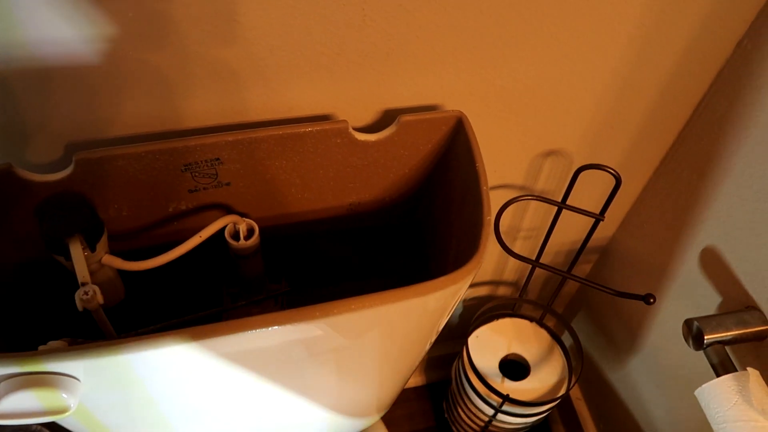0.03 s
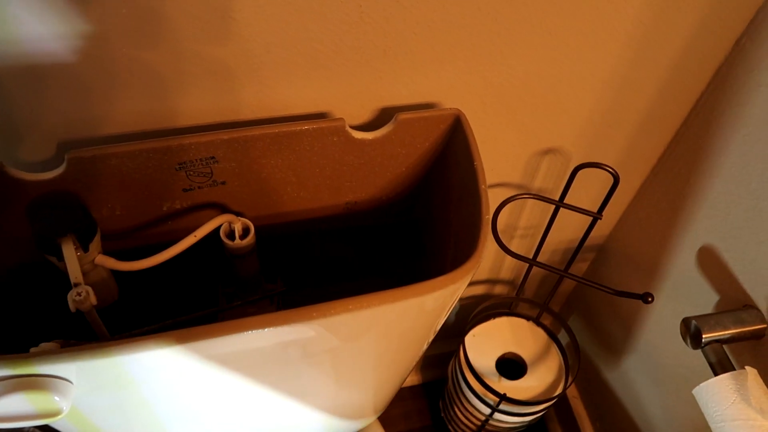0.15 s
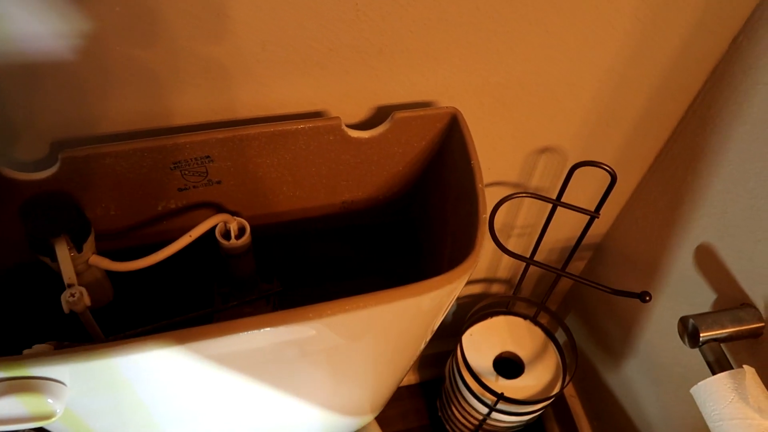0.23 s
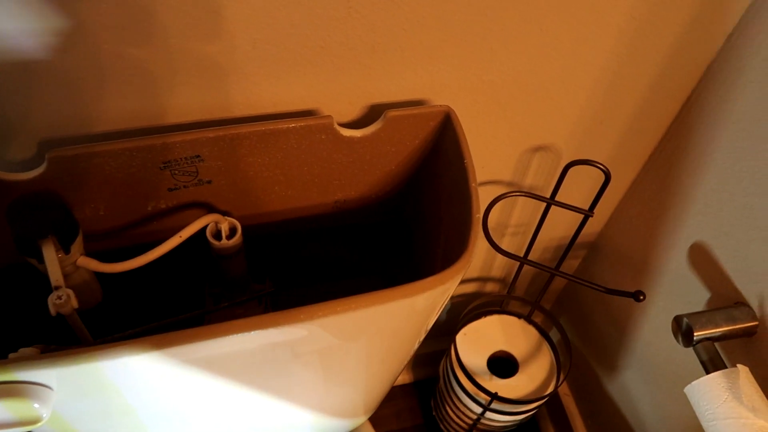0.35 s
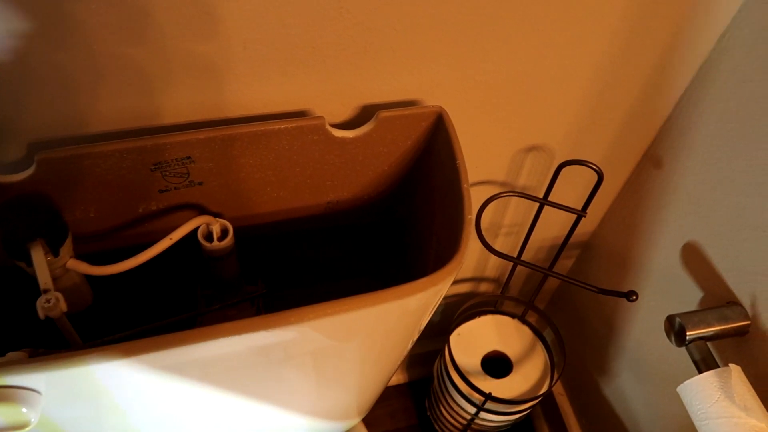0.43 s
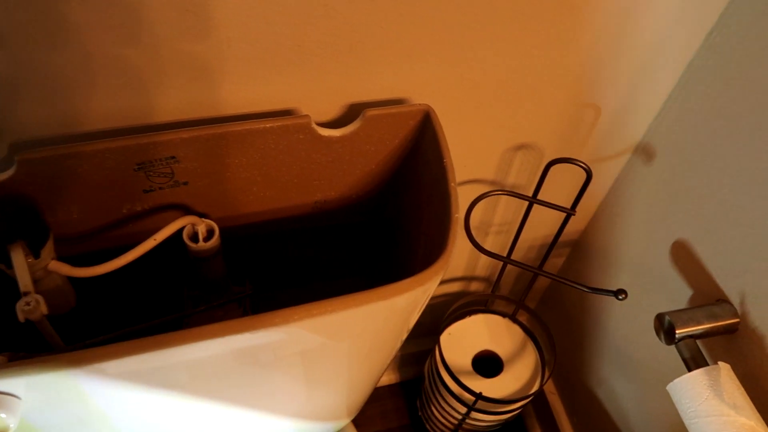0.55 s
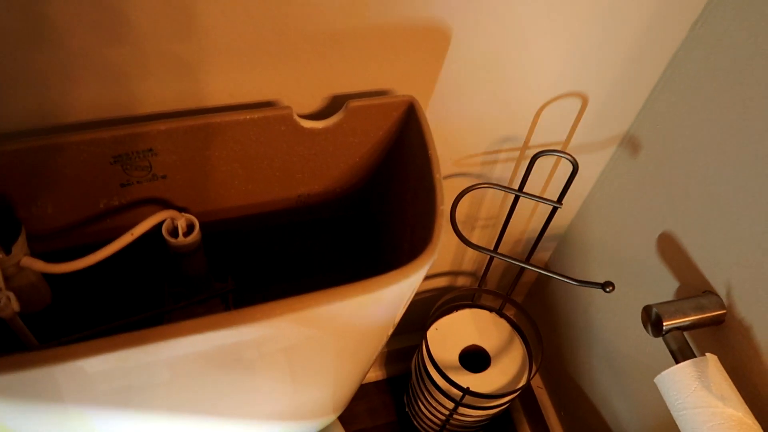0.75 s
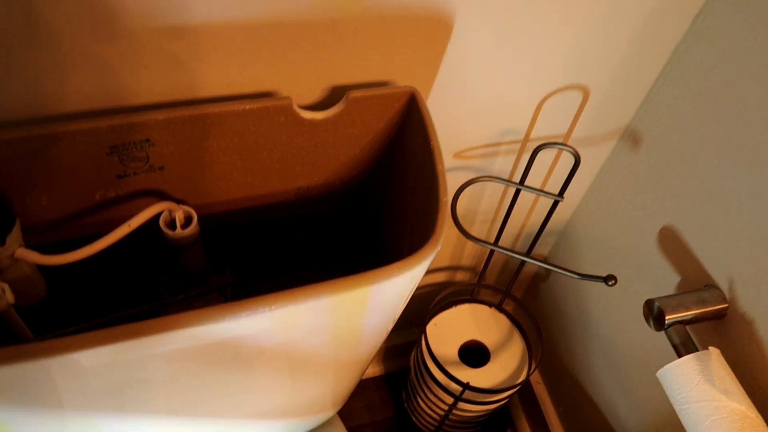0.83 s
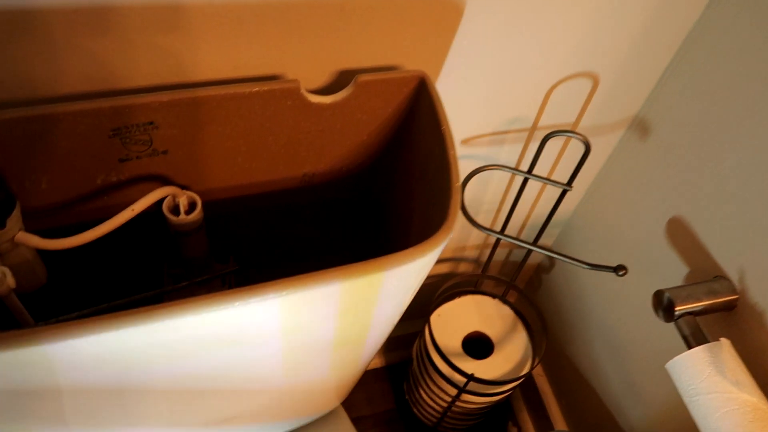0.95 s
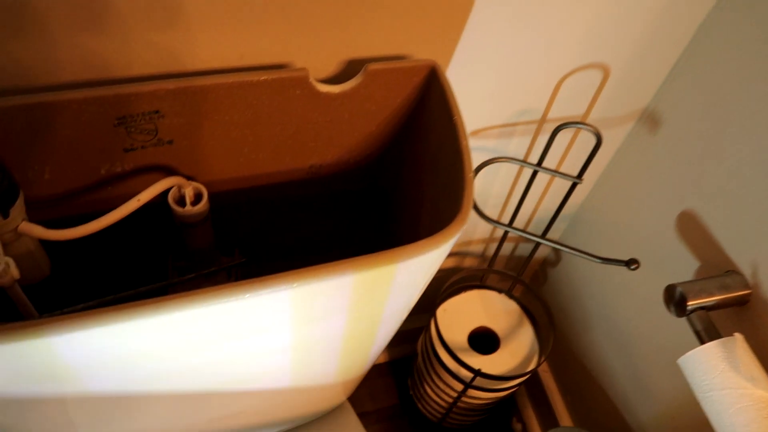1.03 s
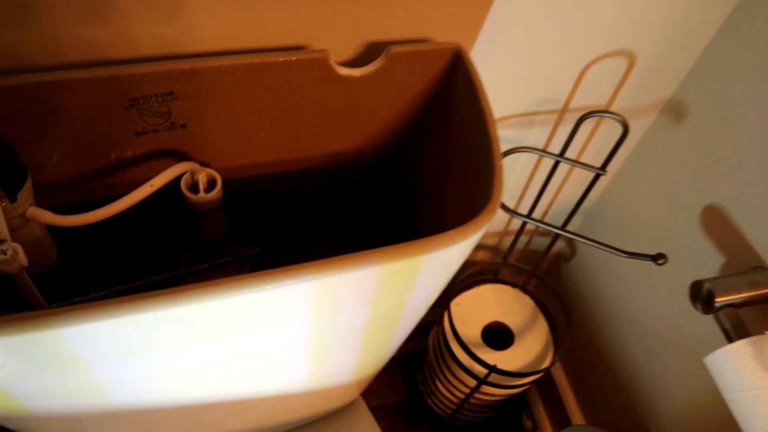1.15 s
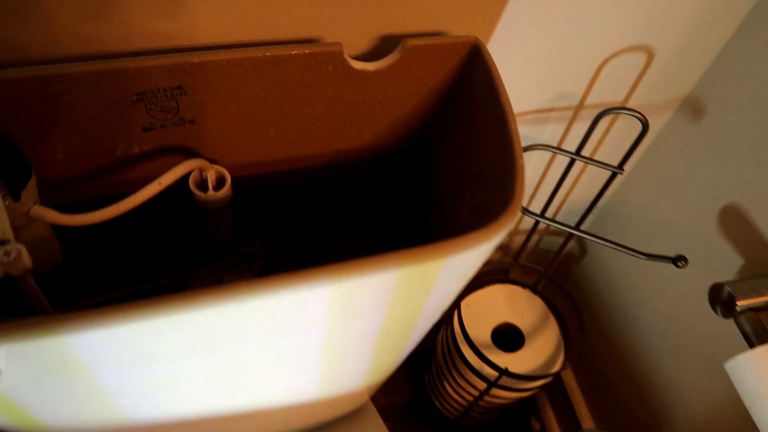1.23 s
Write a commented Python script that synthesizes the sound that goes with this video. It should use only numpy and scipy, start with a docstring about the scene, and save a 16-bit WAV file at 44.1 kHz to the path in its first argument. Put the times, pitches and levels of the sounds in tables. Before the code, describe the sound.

A heavy ceramic toilet tank lid is set down: one end knocks, it scrapes briefly, then the other end lands harder with a short ringing clunk and settles. Heard close by in a small, quiet bathroom.

```python
"""In a small, quiet bathroom a heavy ceramic piece, probably a toilet tank lid, is set down.
One end knocks, the piece scrapes briefly, and the other end lands harder, rocks and settles with a bump.
Each impact excites damped modes of the ceramic and its support, with a clatter of short rings and echoes.
Friction makes the scrape and the faint rubbing that follows; a low room rumble lies beneath it all."""
import sys
import numpy as np
from scipy import signal
from scipy.fft import rfft, irfft
from scipy.io import wavfile

SR = 44100
rng = np.random.default_rng(int(sys.argv[2]) if len(sys.argv) > 2 else 0)


def generate_wav(signal):
    """Clip the signal to [-1, 1] and save it as 16-bit WAV at the path in sys.argv[1]."""
    frames = np.transpose(np.atleast_2d(signal))
    scaled = np.clip(frames, -1, 1) * 32767
    pcm = np.round(scaled).astype(np.int16)
    wavfile.write(sys.argv[1], SR, pcm)


N = 57330
T = np.arange(N) / SR
HZ = np.fft.rfftfreq(N, 1 / SR)

# impacts: t/s, ring/dB, thump/dB, clatter/dB, cutoff/Hz, place (0 first end, 1 second end), t60 factor
IMPACTS = [(0.247, -15, -20, -23, 11800, 0, 0.79), (0.5169, -14.5, -17.5, -19.5, 12400, 0.97, 0.82),
           (0.532, -20, -20.5, -25, 5000, 1, 0.73), (0.581, -22, -24.5, -28, 2150, 1, 0.66),
           (0.793, -31, -28.5, -36.5, 1200, 0.84, 0.54)]
# modes of the ceramic: f/Hz, level struck at first end/dB, level struck at second end/dB, base t60/s
CERAMIC_MODES = [(590, -9, -8, .38), (636, -11, -3, .38), (862, -7, 0, .25), (967, -10, -3, .42),
                 (1082, -11, -10, .22), (1292, -8, -1, .36), (1475, -18, -14, .25), (1592, -15, -14, .25),
                 (1767, -12, -9, .17), (1854, -8, -9, .42), (2040, -11, -10, .26), (2125, -16, -16, .22),
                 (2383, -19, -13, .2), (3063, -23, -29, .14), (3408, -23, -20, .34), (3893, -16, -13, .2),
                 (4097, -40, -21, .22)]
# low modes of the support and the room: f/Hz, first-end level/dB, second-end level/dB, base t60/s
SUPPORT_MODES = [(94.73, 4, 5, 0.44), (130.6, -26, -5, 0.51), (178.3, -14.5, -12.5, 0.97),
                 (212.8, -13, -1, 0.6), (249.8, -5, 1.5, 0.27), (316.3, -24, 0, 0.23),
                 (359, -5.5, -3.5, 0.37), (369.7, -15, -9.5, 0.33)]
# spectrum of short rings and wall echoes: f/Hz, relative level/dB
CLATTER_SPECTRUM = [(30, -45), (80, -26), (140, -5), (300, -0.5), (400, -4.5), (500, -4.5), (700, -7.5),
                    (1100, -1.5), (1500, -6), (2100, -4.5), (2800, -14.5), (4000, -19.5), (5200, -28.5),
                    (8000, -38), (11500, -44), (13500, -63)]
# their decay: f/Hz, base t60/s
CLATTER_DECAY = [(80, 0.42), (250, 0.62), (700, 0.58), (1500, 0.26), (3000, 0.36), (6000, 0.43),
                 (12000, 0.45)]
# envelope of the slide: t/s, level/dB
SCRAPE_ENVELOPE = [(0.281, -36.5), (.315, -32), (.355, -29), (0.389, -33), (0.426, -35), (0.459, -42),
                   (.5, -52)]
# spectrum of sliding friction: f/Hz, relative level/dB
SCRAPE_SPECTRUM = [(60, -12), (250, -18), (500, 3.5), (660, -1.5), (900, 6), (1250, -15), (1550, -5.5),
                   (2000, -4), (3000, -16), (5000, -21), (8000, -28), (12000, -33.5), (14000, -34)]
# resonances driven by the slide: f/Hz, bandwidth/Hz, relative level/dB
SCRAPE_RESONANCES = [(477, 69, 4.5), (880, 110, 3.5), (1196, 33, 4), (1320, 29, 6.5), (1860, 25, -5),
                     (2770, 96, -10.5), (3160, 99, -11), (5230, 110, -17)]
# squeak early in the slide: t/s, Gaussian width/s, f/Hz
SQUEAK = (.318, .011, 4300)
# light touches on one ceramic mode: t/s, level/dB, f/Hz, t60/s
TOUCHES = [(1.012, -40.5, 1285, 0.12), (1.133, -45.5, 1287, 0.29)]
# dull handling bumps: t/s, level/dB, f/Hz
BUMPS = [(0.723, -30.5, 67.6), (0.961, -33, 66.6), (0.984, -43, 152)]
# taps on a light part: t/s, level/dB, t60/s
TAPS = [(0.136, -46.5, 0.21), (0.742, -53.5, 0.16)]
# resonances of that part, before squaring: f/Hz, bandwidth/Hz, relative level/dB
TAP_RESONANCES = [(1396, 110, 1), (2040, 420, 5.5), (2940, 440, 1.5)]
# edge contact in the hard landing: t/s, level/dB, f/Hz, Gaussian width/octaves, t60/s
EDGE_CLICK = (0.5332, -40, 9500, .3, .022)
# light rubs: t/s, Gaussian width/s, hiss level/dB, ring level/dB
RUBS = [(0.752, 0.026, -49, -45.5), (0.848, 0.046, -50.5, -59), (0.968, 0.038, -47.5, -72),
        (1.028, 0.031, -54.5, -55), (1.15, 0.048, -53, -52)]
# spectrum of their hiss: f/Hz, relative level/dB
RUB_SPECTRUM = [(60, -48), (300, 11.5), (900, 1), (1800, -2), (2800, -5), (5000, -14.5), (10000, -31),
                (14000, -42)]
# room rumble and hiss: f/Hz, relative level/dB
ROOM_SPECTRUM = [(15, -8), (35, -30), (62, 5.5), (85, -8.5), (130, 0.5), (190, -9), (300, -12), (500, -18),
                 (1000, -25), (2000, -29), (4000, -36), (8000, -45), (12000, -49.5), (15000, -42)]
# stereo width of the contact noises: f/Hz, side-to-mid ratio/dB
CONTACT_WIDTH = [(60, -77), (250, -26), (700, -20), (1400, -16.5), (2800, -9), (5600, -4), (11000, 5)]
# stereo width of the room noise: f/Hz, side-to-mid ratio/dB
ROOM_WIDTH = [(60, -40), (250, -8.5), (700, -6), (1400, -5.5), (2800, -5), (5600, -2), (11000, 2)]
# treble response of the microphone: f/Hz, gain/dB
MIC_RESPONSE = [(10500, -0.5), (12000, -1), (13000, -5), (14500, -16)]


def knocks(crack_hz=3080, crack_db=-10):
    """Impact excitation: each blow cracks, rings the ceramic, thumps the support and stirs the room."""
    out = np.zeros((2, N))
    for s, ring_db, thump_db, clatter_db, cutoff_hz, place, t60_factor in IMPACTS:
        crack = burst(crack_hz, octaves=0.16, t60=0.038) * rise(0.0016)
        crack *= amp(crack_db) * lowpass(crack_hz, cutoff_hz, steepness=10)
        ring = struck(CERAMIC_MODES, place, cutoff_hz, t60_factor) + crack
        thump = struck(SUPPORT_MODES, place, cutoff_hz, t60_factor, rise_cycles=1.6)
        echoes = clatter(cutoff_hz, t60_factor)
        add(out, s, amp(ring_db) * ring + amp(thump_db) * thump + amp(clatter_db) * echoes)
    return out


def struck(modes, place, cutoff_hz, t60_factor, rise_cycles=0):
    """Modal superposition: the striking point weights each mode; a softer contact excites less treble."""
    out = np.zeros((2, N))
    for hz, first_db, second_db, t60 in modes:
        gain = amp(first_db + place * (second_db - first_db)) * lowpass(hz, cutoff_hz, steepness=10)
        out += gain * mode(hz, t60 * t60_factor, rise_s=0.0014 + rise_cycles / hz)
    return out


def mode(hz, t60, rise_s):
    """Damped oscillation: one partial builds up and dies away, wider in stereo the higher it is."""
    phase = 2 * np.pi * (hz * T + rng.random())
    side = 0.12 * hz / 2000 * np.sin(phase + 2 * np.pi * rng.random())
    return (np.sin(phase) + np.array([side, -side])) * decay(t60) * rise(rise_s)


def burst(hz, octaves, t60):
    """Contact transient: a brief, hard collision spreads its energy over a band of frequencies."""
    band = bell(np.log2((HZ + 1) / hz), 0, octaves) * lowpass(HZ, 12000, steepness=60)
    return noise(band, CONTACT_WIDTH) * decay(t60)


def clatter(cutoff_hz, t60_factor):
    """Reverberation: dense rings and echoes merge into noise, each band decaying at its own rate."""
    near_mode = np.max([bell(HZ, hz, 75) for hz, *_ in CERAMIC_MODES], axis=0)
    midrange = np.interp(HZ, [400, 480, 4000, 5000], [0, 1, 1, 0])
    modal_db = (3 * near_mode - 3.5) * midrange  # weaker between the ceramic's modes
    colour = amp(curve(CLATTER_SPECTRUM, HZ) + modal_db) * lowpass(HZ, cutoff_hz, steepness=10)
    hz, t, bands = signal.stft(noise(colour, CONTACT_WIDTH), SR, nperseg=512)
    t60 = t60_factor * curve(CLATTER_DECAY, hz)[:, None]
    tail = signal.istft(bands * decay(t60, t), SR)[1][:, :N]
    early_boost = 1 + amp(-1) * np.exp(-T / 0.018)
    return tail * rise(0.0016) * early_boost


def scrape(resonance_db=3.5, squeak_db=-43):
    """Sliding friction: unglazed ceramic drives resonances between the two knocks and squeaks once."""
    power = sum(abs(resonance(*row)) ** 2 for row in SCRAPE_RESONANCES)
    peaks = amp(resonance_db) * np.sqrt(power) * lowpass(HZ, 6800)
    colour = np.hypot(amp(curve(SCRAPE_SPECTRUM, HZ)), peaks)
    times, levels = np.transpose(SCRAPE_ENVELOPE)
    envelope = amp(np.interp(T, times, levels, left=-120, right=-120))
    s, width_s, hz = SQUEAK
    squeak = amp(squeak_db) * bell(T, s, width_s) * np.sin(2 * np.pi * hz * T)
    return envelope * stereo(grit(), colour, CONTACT_WIDTH) + squeak


def grit(catches_per_s=1200):
    """Friction noise: many tiny catches of uneven size occur at random over a smoother hiss."""
    catches = rng.random(N) < catches_per_s / SR
    size_db = np.minimum(rng.exponential(1, N), 4)
    impulses = unit(catches * amp(size_db) * rng.standard_normal((2, N)))
    return impulses + 1.5 * rng.standard_normal((2, N))


def handling(rise_s=0.0033, bump_t60=0.22):
    """Free vibration: after the landing, each faint touch or dull bump excites a single mode."""
    out = np.zeros((2, N))
    for s, db, hz, t60 in TOUCHES:
        add(out, s, amp(db) * mode(hz, t60, rise_s))
    for s, db, hz in BUMPS:
        add(out, s, amp(db) * mode(hz, bump_t60, rise_s))
    return out


def ticks():
    """Transient excitation: two taps stir a light part's resonances; an edge contact clicks brightly."""
    out = np.zeros((2, N))
    colour = abs(sum(resonance(*row) for row in TAP_RESONANCES)) ** 2
    for s, db, t60 in TAPS:
        add(out, s, amp(db) * noise(colour, CONTACT_WIDTH) * decay(t60))
    s, db, hz, octaves, t60 = EDGE_CLICK
    add(out, s, amp(db) * burst(hz, octaves, t60))
    return out


def rubs(cutoff_hz=1500, bandwidth_hz=25):
    """Forced vibration: light friction hisses and faintly drives the ceramic's modes."""
    body = sum(resonance(hz, bandwidth_hz, db) for hz, db, _, _ in CERAMIC_MODES)
    hiss = stereo(grit(), amp(curve(RUB_SPECTRUM, HZ)), CONTACT_WIDTH)
    ring = stereo(grit(), body * lowpass(HZ, cutoff_hz), CONTACT_WIDTH)
    return sum(bell(T, s, width_s) * (amp(hiss_db) * hiss + amp(ring_db) * ring)
               for s, width_s, hiss_db, ring_db in RUBS)


def room_noise(level_db=-41.5, drift_db=0.25):
    """Ambient noise: low rumble and faint hiss under a slight, slow amplitude modulation."""
    drift = unit(irfft(rfft(rng.standard_normal(N)) * lowpass(HZ, 6.4), N))
    return amp(level_db + drift_db * drift) * noise(amp(curve(ROOM_SPECTRUM, HZ)), ROOM_WIDTH)


def noise(gain, width):
    """Spectral shaping: white noise takes on a colour and a stereo width."""
    return stereo(rng.standard_normal((2, N)), gain, width)


def stereo(pair, gain, width):
    """Mid-side stereo: the sum and difference of two filtered signals, scaled to a mid rms of 1."""
    mid = irfft(rfft(pair[0]) * gain, N)
    side = irfft(rfft(pair[1]) * gain * amp(curve(width, HZ)), N)
    return np.array([mid + side, mid - side]) / (mid.std() + 1e-20)


def resonance(hz, bandwidth_hz, db):
    """Complex frequency response of a single-pole resonator."""
    return amp(db) / (1 + 2j * (HZ - hz) / bandwidth_hz)


def lowpass(hz, cutoff_hz, steepness=4):
    """Low-pass gain, falling towards 3 dB per octave for each unit of steepness."""
    return 1 / np.sqrt(1 + (hz / cutoff_hz) ** steepness)


def decay(t60, t=T):
    """Exponential damping by 60 dB in t60 seconds."""
    return np.exp(-np.log(1000) * t / t60)


def rise(rise_s):
    """Exponential approach to full amplitude."""
    return 1 - np.exp(-T / rise_s)


def bell(x, centre, width):
    """Gaussian curve of height 1."""
    return np.exp(-.5 * ((x - centre) / width) ** 2)


def amp(db):
    """Amplitude ratio of a level in decibels."""
    return 10 ** (np.asarray(db) / 20)


def unit(x):
    """Normalisation to rms 1."""
    return x / np.sqrt(np.mean(x ** 2) + 1e-20)


def curve(points, hz):
    """Interpolation on a logarithmic frequency axis."""
    f, value = np.transpose(points)
    return np.interp(np.log(hz + 1), np.log(f + 1), value)


def add(mix, s, sound):
    """Delay and sum: a sound enters the mix at s seconds."""
    start = max(round(s * SR), 0)
    mix[:, start:] += sound[..., :N - start]


def scene():
    """Linear superposition: the pressures of all sources add."""
    return knocks() + ticks() + scrape() + rubs() + handling() + room_noise()


def record(dry, band_limit_hz=14600):
    """Saturation and band limiting: peaks are rounded softly and the top treble falls away."""
    rounded = dry / (1 + dry ** 4) ** (1 / 4)
    dulled = irfft(rfft(rounded) * amp(curve(MIC_RESPONSE, HZ)), N)
    kernel = signal.firwin(255, band_limit_hz, window=("kaiser", 9), fs=SR)
    return signal.oaconvolve(dulled, kernel[None], "same")


dry = scene()
out = record(dry)
generate_wav(out)
```